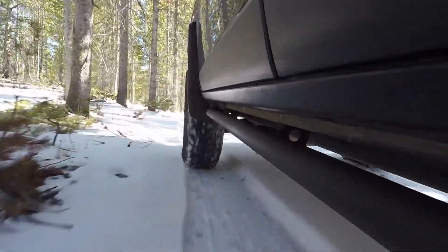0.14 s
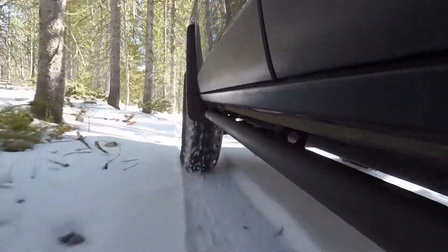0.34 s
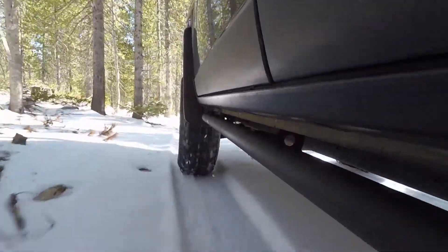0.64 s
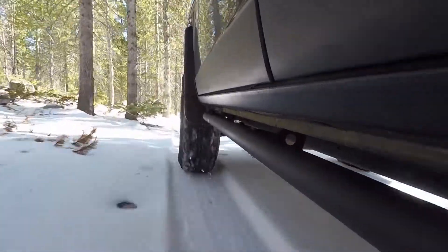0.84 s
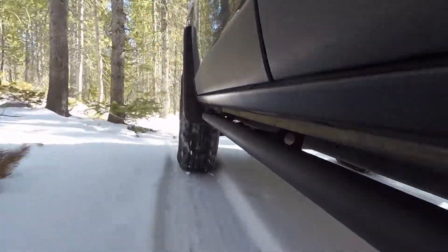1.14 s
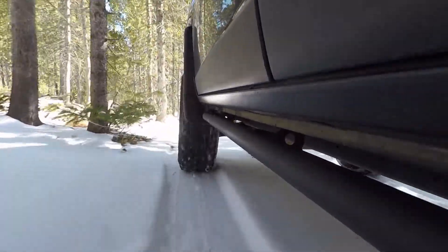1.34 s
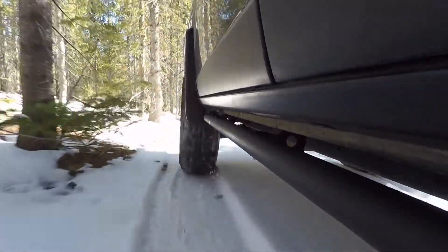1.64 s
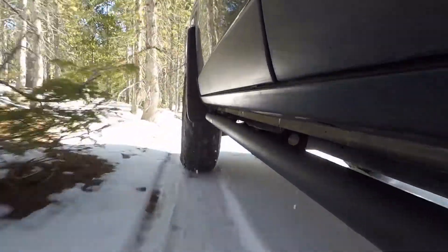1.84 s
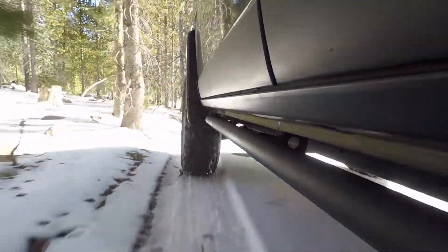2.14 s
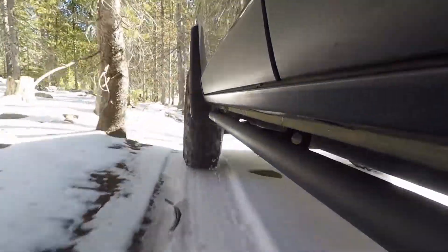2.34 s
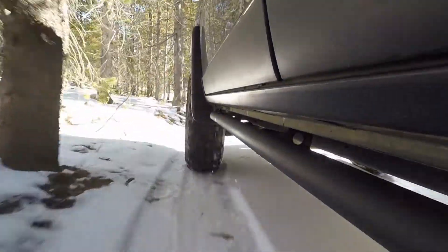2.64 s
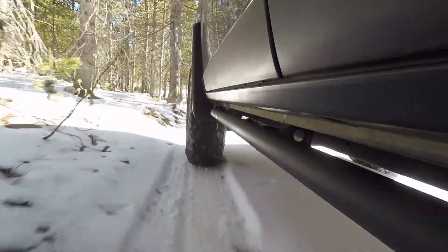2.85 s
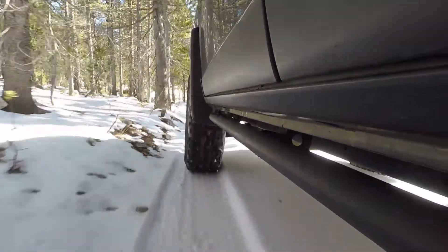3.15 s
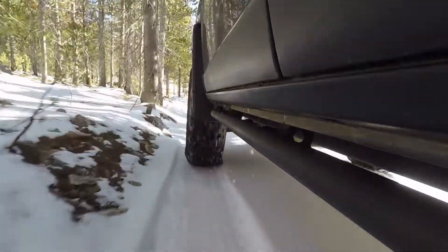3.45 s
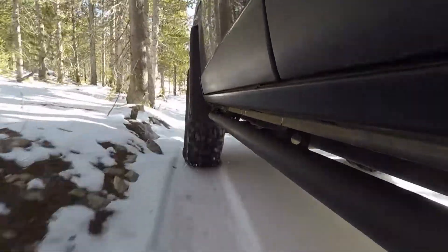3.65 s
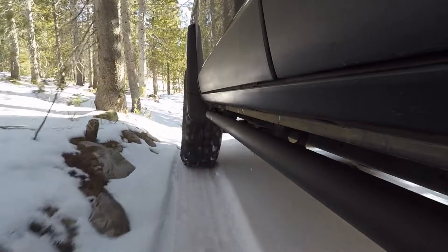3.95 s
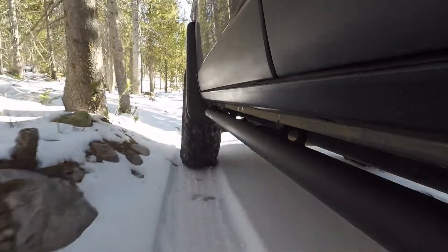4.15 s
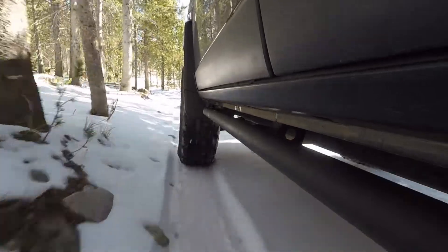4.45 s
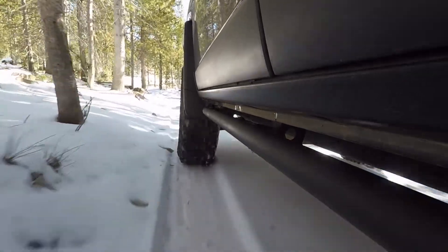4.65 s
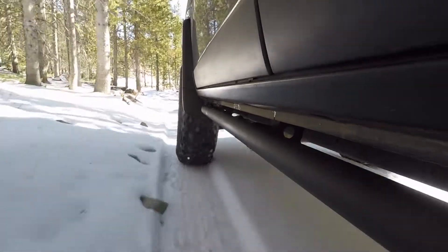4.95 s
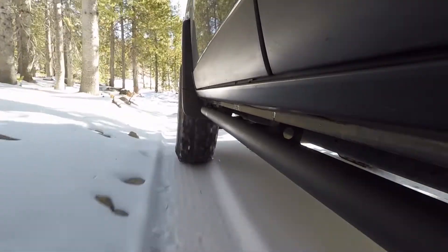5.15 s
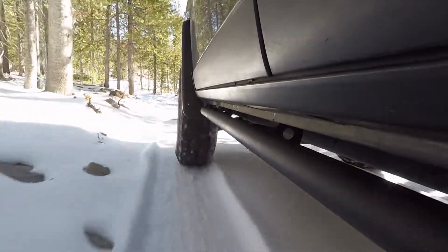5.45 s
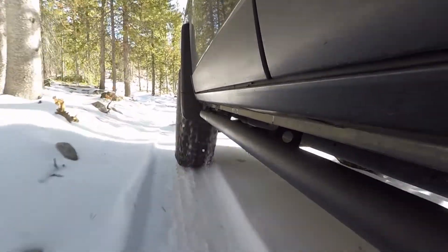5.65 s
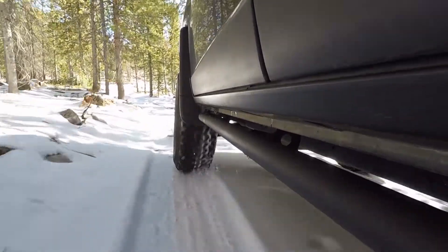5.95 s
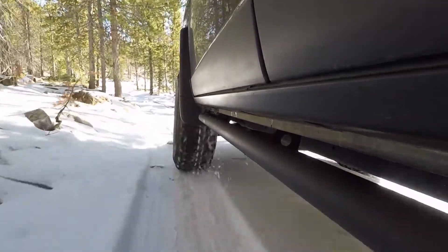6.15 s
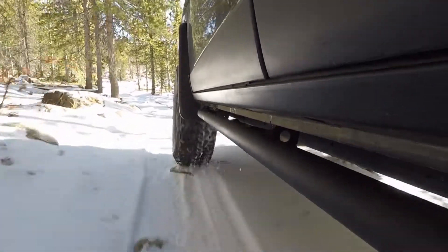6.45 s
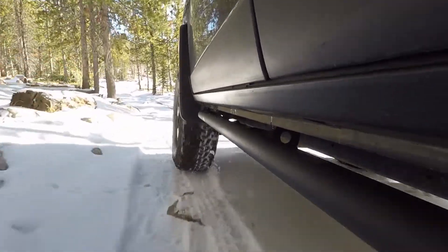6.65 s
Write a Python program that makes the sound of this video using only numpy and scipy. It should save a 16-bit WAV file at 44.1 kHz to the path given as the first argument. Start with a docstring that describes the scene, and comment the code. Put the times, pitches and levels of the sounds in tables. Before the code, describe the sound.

Close beside a rolling tyre, engine drone gives way to rumbling snow crunches, soft thumps, brittle snaps and a fine icy hiss.

```python
"""A four-wheel-drive truck rolls slowly along a snowy forest trail, heard from the sill just behind a front tyre.
At first the exhaust hums under load, a harmonic series on the firing rate, while wind noise buffets the microphone.
Then the throttle is eased: the hum drops away and the truck rocks on its springs, a damped oscillation of the boom.
As the hum fades the snow grows louder: showers of small collapses excite the tyre and snow in crunches and thuds.
Throughout, brief fractures of ice and twigs snap, and dense crystal impacts hiss against the body."""
import sys
import numpy as np
from scipy import signal
from scipy.fft import rfft, irfft
from scipy.io import wavfile
from scipy.ndimage import uniform_filter1d

SR = 44100
rng = np.random.default_rng(int(sys.argv[2]) if len(sys.argv) > 2 else 0)


def pcm_store(signal):
    """Save signal as 16-bit PCM."""
    levels = np.round(np.clip(np.atleast_2d(signal), -1, 1) * 32767)
    wavfile.write(sys.argv[1], SR, levels.astype(np.int16).T)


N = 300309
TIME = np.arange(N) / SR

# Slabs of packed snow giving way under the tread. Each row: start in seconds, relative crack level in dB,
# relative thud level in dB, crumbling time in seconds.
SLAB_BREAKS = [(0.112, -11, -7.5, .004), (0.436, -15, -11, 0.0087), (0.615, -21, -23, 0.0068),
               (1.106, -28, -17, .012), (1.321, -19, -13.5, 0.0085), (1.465, -15, -20, 0.0076),
               (1.621, -16, -17, .005), (1.771, -20, -27, .004), (1.828, -15.5, -18, 0.012),
               (2.017, -25, -15, 0.0069), (2.228, -19, -10, 0.03), (2.305, -11.5, -23, 0.014),
               (2.396, -12.5, -25, 0.0023), (2.514, -11, -8, 0.012), (2.557, -22, -5, 0.006),
               (2.599, -9, -11, 0.0046), (2.725, -21, -12, 0.0024), (3.009, -15, -10, 0.0037),
               (3.067, -11.5, -9.5, 0.007), (3.105, -15.5, -6, 0.015), (3.268, -14, -6, 0.016),
               (3.414, -13.5, -21, 0.0039), (3.68, -24, -5.5, 0.0038), (3.706, -28, -6, 0.0034),
               (3.761, -27, -9.5, 0.014), (3.966, -19, -4.5, .007), (4.037, -20.5, -19, .005),
               (4.068, -17, -9.5, 0.01), (4.33, -21, -6, 0.0058), (4.389, -16, -12, 0.0056),
               (4.428, -7.5, -3, 0.0027), (4.557, -14.5, -21, 0.0066), (4.604, -15, -5, 0.0028),
               (5.449, -18, -10, 0.011), (5.838, -28, -12, .003), (5.879, -20, -18, 0.0046),
               (5.902, -19, -29, .003), (5.988, -14, -10, 0.012), (6.066, -25, -21, 0.0099),
               (6.148, -15, -11, 0.0059), (6.283, -18, -8.5, 0.0044), (6.302, -22.5, -12.5, 0.0076),
               (6.469, -25, -14, 0.053), (6.71, -21, -13.5, 0.0086), (6.775, -37, -16, 0.014)]
# Icy crust splintering. Each row: time in seconds, relative level in dB.
CRUST_LEVEL = [(0, -39), (0.8, -50), (1.3, -47), (2.0, -44), (2.5, -43.5), (3.5, -48.5), (4.15, -46.5),
               (5.15, -46.5), (5.5, -43), (5.8, -48), (6.81, -48.5)]
# Spectrum of crunching snow. Each row: frequency in Hz, relative density in dB per Hz.
CRUNCH_SPECTRUM = [(150, -33.5), (340, -7), (455, 4.5), (525, 8.5), (600, 3), (680, 3.5), (800, -1.5),
                   (930, -4), (1080, -11), (1600, -22), (2200, -34), (3000, -53), (5000, -58.5),
                   (10000, -66)]
# Spectrum with which the tyre's carcass rings. Each row: frequency in Hz, relative density in dB per Hz.
CARCASS_SPECTRUM = [(40, -29), (85, -16.5), (120, -15), (200, -14.5), (240, -4.5), (300, -3), (355, -0.5),
                    (410, -4.5), (455, -8.5), (520, -6), (600, -13), (1000, -31), (2000, -67.5)]
# Spectrum of a snapping piece. Each row: multiple of its pitch, relative density in dB per Hz.
SNAP_SPECTRUM = [(.25, -15), (.7, -5), (1, 0), (1.35, -6), (2, -13), (3, -22), (6, -35)]
# The microphone's housing dulls the top of snaps and grit. Each row: frequency in Hz, relative gain in dB.
HOUSING_RESPONSE = [(300, 0), (3300, 0), (5000, -7), (6600, -3), (7800, -12), (10000, -11), (12000, -25),
                    (15000, -35)]


def from_db(db):
    """Logarithmic level: decibels become an amplitude gain."""
    return 10 ** (np.asarray(db) / 20)


def rms_one(x):
    """Power normalisation: scale to an rms of 1."""
    return x / np.sqrt(np.mean(x ** 2) + 1e-20)


def in_time(rows):
    """Linear interpolation: each column of a curve at every sample."""
    seconds, *columns = np.transpose(rows)
    return [np.interp(TIME, seconds, column) for column in columns]


def drift(rate_hz):
    """Low-passed noise: a slow random curve of rms 1, changing about rate_hz times a second."""
    step = 40  # samples between computed points
    pole = np.exp(-2 * np.pi * step * rate_hz / SR)
    noise = rng.standard_normal(N // step + 2002)
    slow = signal.lfilter([1], [1, -2 * pole, pole * pole], noise)[2000:]  # drop the filter's start
    return np.interp(np.arange(N) / step, np.arange(len(slow)), rms_one(slow))


def response(spectrum):
    """Minimum-phase principle: the causal impulse response of a given spectrum, with unit energy."""
    size = 8192
    hz, db = np.transpose(spectrum)
    bins = np.maximum(np.arange(size // 2 + 1) * SR / size, 1)
    skirt = np.minimum(hz[-1] / bins, 1) ** 2  # extra fall above the last listed frequency
    gain = skirt * from_db(np.interp(np.log(bins), np.log(hz), db))
    # folding the cepstrum onto positive time makes the response causal
    cepstrum = irfft(np.log(gain))
    cepstrum[1:size // 2] *= 2
    cepstrum[size // 2 + 1:] = 0
    impulse = irfft(np.exp(rfft(cepstrum)))
    return impulse / np.linalg.norm(impulse)


def colour(force, spectrum):
    """Linear filtering: a body answers a force with its own spectrum."""
    return signal.fftconvolve(force, response(spectrum))[:N]


def shifted(spectrum, ratio):
    """Geometric scaling: the same spectrum for a smaller (higher) or larger (lower) body."""
    return [(hz * ratio, db) for hz, db in spectrum]


def grains(per_s, spread_db, even_s):
    """Random impulses: clicks of exponentially spread level, with power evened out over even_s seconds."""
    excess = np.minimum(rng.exponential(1, N), 4)
    sizes = from_db(spread_db * excess) * rng.choice([-1, 1], N)
    clicks = sizes * (rng.random(N) < per_s / SR)
    power = np.maximum(uniform_filter1d(clicks ** 2, int(even_s * SR)), 0)
    return clicks / np.sqrt(power + 1e-6)


def fracture(decay_s, crumble):
    """Brittle release: one sharp impulse, then a dying shower of smaller ones."""
    t = TIME[:SR // 10]
    pieces = rng.uniform(-1, 1, len(t)) * (rng.random(len(t)) < 4000 / SR)  # 4000 a second
    force = crumble * pieces * np.exp(-t / decay_s)
    force[0] = 1
    return force


def add(track, start_s, sound, peak_db):
    """Superposition: mix a sound in at start_s with the given peak level."""
    start = max(int(start_s * SR), 0)
    part = track[start:start + len(sound)]
    scaled = from_db(peak_db) * sound / np.abs(sound).max()
    part += scaled[:len(part)]


def wind(level_db=3.0, gust_db=1.0):
    """Turbulence: eddies at the microphone port make a lumpy low noise."""
    # Each row: time in seconds, relative level in dB.
    flow = [(0, -26), (0.75, -29.5), (1.4, -27), (2.03, -29), (2.22, -22), (2.5, -25), (2.85, -31.5),
            (3.25, -27.5), (4.15, -27), (4.48, -39), (4.8, -27.5), (5.5, -30.5), (6.81, -29)]
    # Each row: frequency in Hz, relative density in dB per Hz.
    eddy_spectrum = [(10, -12), (22, -1), (45, 6.5), (68, 1.5), (88, 7), (115, -3.5), (160, -25.5),
                     (400, -50)]
    flow_db, = in_time(flow)
    eddies = colour(rng.standard_normal(N), eddy_spectrum)
    return eddies * from_db(flow_db + level_db + gust_db * drift(6.9))


def exhaust(wobble_db=0.55, gas_db=-19, whine_db=-44):
    """Periodic pulses: a firing tone with lines that unequal cylinders add, over the gas flow's low noise."""
    # Each row: time in seconds, firing rate in Hz, relative level in dB.
    engine = [(0, 127.5, -12.3), (.27, 127.2, -12), (.55, 124.3, -13.2), (.69, 123.8, -10.9),
              (.9, 124.7, -11.2), (1.07, 126, -13), (1.22, 126.2, -11.4), (1.47, 127.3, -13.6),
              (1.6, 127.3, -11.9), (1.72, 126.2, -13), (1.8, 123.8, -15.5), (1.87, 122.4, -23),
              (2.1, 119.5, -26), (2.4, 114, -33), (2.8, 110, -42), (6.81, 104, -46)]
    # Each row: multiple of the firing rate, level in dB relative to the engine's.
    order_lines = [(0.751, -15), (1, 0.5), (1.25, -22), (1.499, -19), (2, -31.5), (2.997, -35)]
    # The line at half the firing rate, from two cylinder banks beating unequally.
    # Each row: time in seconds, level in dB relative to the engine's.
    half_order = [(0, -5.5), (.25, -8), (.7, -11.5), (1.0, -10.5), (1.4, -6), (1.7, -10), (2.2, -9)]
    # Each row: frequency in Hz, relative density in dB per Hz.
    gas_spectrum = [(25, -20.5), (55, -8.5), (95, 10.5), (160, -11), (260, -19.5), (600, -26)]
    firing_hz, level_db = in_time(engine)
    half_db, = in_time(half_order)
    waver = 0.004  # rms share of the firing rate
    phase = 2 * np.pi * np.cumsum(firing_hz * (1 + waver * drift(6.3))) / SR
    out = from_db(gas_db) * colour(rng.standard_normal(N), gas_spectrum)
    for order, db in [(0.5, half_db)] + order_lines:
        # only the firing tone and its half order wobble in level
        if order in (0.5, 1):
            db = db + wobble_db * drift(2.4)
        line = np.sin(order * phase + rng.uniform(0, 2 * np.pi))
        out += np.sqrt(2) * from_db(db) * line
    # a belt-driven accessory whines faintly, geared to the crank
    whine = np.sqrt(2) * np.sin(14 * phase)
    out += from_db(whine_db) * whine
    # the hum throbs unevenly
    throb_hz, throb_db = 10.5, 0.6
    throb = throb_db * np.sin(2 * np.pi * throb_hz * TIME + drift(2.2))
    return from_db(level_db + throb) * out


def spray(level_db=10.0, flutter_db=1.0):
    """Dense impacts: fine crystals fly off the tread and patter on the sill, merging into a hiss."""
    # Snow thrown against the body. Each row: time in seconds, relative level in dB.
    thrown = [(0, -58), (0.68, -60.5), (0.84, -59.5), (1.0, -62), (1.13, -58.5), (1.3, -62.5),
              (1.84, -59.5), (1.92, -56), (2.05, -56), (2.13, -52), (2.22, -54), (2.5, -53.5),
              (2.57, -59.5), (2.8, -56), (2.92, -57.5), (3.08, -57.5), (3.25, -54.5), (3.42, -51.5),
              (3.7, -52.5), (3.96, -49), (4.05, -50.5), (4.29, -50), (4.44, -55), (4.55, -52.5),
              (4.95, -51), (5.12, -55.5), (5.5, -53), (5.8, -58), (6.1, -57.5), (6.81, -61)]
    # Each row: frequency in Hz, relative density in dB per Hz.
    patter_spectrum = [(500, -5.5), (1500, 9), (2900, 6.5), (4000, -0.5), (5100, -5.5), (5800, -1.5),
                       (6450, 1), (7500, -8.5), (9500, -9.5), (11300, -18), (13200, -22), (15500, -26.5)]
    thrown_db, = in_time(thrown)
    crystals = grains(per_s=4500, spread_db=0.5, even_s=0.16)
    gain_db = thrown_db + level_db + flutter_db * drift(16)
    return colour(crystals * from_db(gain_db), patter_spectrum)


def ridges(rebound=0.2):
    """Load transfer: half-sine swells on ridges or dips in hollows, each with a weaker swing back; gain in dB."""
    # Ridges of packed snow, and hollows (negative). Each row: middle in seconds, length in seconds,
    # extra load in dB.
    bumps = [(0.514, 0.11, -2.5), (0.716, 0.054, 4.5), (1.116, 0.076, 5.5), (1.783, 0.032, -6),
             (1.874, 0.2, 4), (2.115, 0.058, 8), (2.195, 0.042, -5), (2.338, 0.11, 4), (2.542, 0.044, 5),
             (2.568, 0.026, -10), (2.805, 0.06, 4.5), (2.84, 0.019, 3.5), (2.942, 0.081, -5),
             (3.088, 0.022, -6), (3.132, 0.032, 6), (3.25, 0.054, -4.5), (3.36, 0.13, 1), (3.612, 0.07, -5),
             (3.903, 0.08, -1), (4.01, 0.043, -2.5), (4.405, 0.088, 4.5), (4.45, 0.034, -4),
             (4.834, 0.086, 1.5), (4.967, 0.077, 4.5), (5.379, 0.029, 4), (5.797, 0.097, -4),
             (5.934, 0.041, -1), (6.188, 0.098, -3.5), (6.293, 0.04, 4.5), (6.51, 0.08, 4),
             (6.744, 0.04, -5.5)]
    out = np.zeros(N)
    for middle_s, length_s, db in bumps:
        swell = np.sin(np.pi * np.clip((TIME - middle_s) / length_s + 0.5, 0, 2))
        out += db * np.maximum(swell, rebound * swell)  # the negative half is the rebound
    return out


def grit(level_db=-4.5):
    """Random fracture: small bits of ice of several sizes crack, at a level that follows the crust."""
    crust_db, = in_time(CRUST_LEVEL)
    bits = np.zeros(N)
    for hz in (900, 1100, 1350, 1700, 2300):
        cracks = grains(per_s=14, spread_db=2, even_s=0.9)
        bits += colour(cracks, shifted(SNAP_SPECTRUM, hz))
    return rms_one(colour(bits, HOUSING_RESPONSE)) * from_db(crust_db + level_db)


def crackle(level_db=0.5, follows=0.43, tilt_db=-12.5, burst_db=1.06):
    """Struck resonators: crust splinters ring for a few cycles at pitches set by size, louder on ridges."""
    crust_db, = in_time(CRUST_LEVEL)
    gain_db = crust_db + follows * ridges() + level_db + burst_db * drift(30)
    width = 0.075  # ring bandwidth as a share of the pitch
    out = np.zeros(N)
    for hz in np.geomspace(1100, 3900, 14):
        pole = np.exp(-np.pi * width * hz / SR)
        splinters = grains(per_s=24, spread_db=1.5, even_s=0.15)
        feedback = [1, -2 * pole * np.cos(2 * np.pi * hz / SR), pole * pole]
        ring = signal.lfilter([1 - pole, 0, pole - 1], feedback, splinters)
        out += from_db(tilt_db * np.log2(hz / 1000)) * ring  # tilt per octave
    muffled = signal.sosfilt(signal.butter(2, 4600, fs=SR, output="sos"), out)
    return rms_one(muffled) * from_db(gain_db)


def snaps():
    """Impulse response: ice and twigs snap, shed a little debris and ring briefly at their own pitch."""
    # Each row: start in seconds, peak level in dB, crumbling time in seconds, pitch in Hz.
    pieces = [(.059, -16, .001, 1150), (.169, -15.5, .0008, 1550), (.188, -20, .0005, 1200),
              (.1885, -26, .0009, 6500), (.2345, -31, .0007, 8000), (.415, -16, .002, 850),
              (.432, -17, .008, 1150), (.512, -33, .005, 7500), (.876, -22, .002, 1250),
              (1.097, -27, .001, 1600), (1.129, -18, .002, 1000), (1.298, -22, .003, 1350),
              (1.468, -21, .004, 1100), (1.622, -17.5, .003, 900), (1.71, -28, .003, 3800),
              (1.833, -15, .002, 800), (2.457, -13, .001, 1100), (2.534, -13, .002, 1000),
              (2.642, -25, .002, 1700), (2.795, -24, .004, 2200), (2.802, -19, .003, 1200),
              (2.879, -19, .001, 950), (2.986, -26, .003, 1700), (3.049, -20.5, .006, 2300),
              (3.092, -34, .005, 4300), (3.16, -19, .001, 1200), (3.291, -19, .002, 1300),
              (3.477, -20, .001, 1200), (3.712, -26, .001, 2500), (3.752, -20, .001, 1400),
              (3.833, -20, .003, 2000), (3.974, -18, .003, 1700), (3.988, -20, .001, 1500),
              (4.1205, -11, .0015, 1200), (4.137, -19, .001, 1800), (4.167, -21, .001, 2300),
              (4.3215, -20, .0005, 1500), (4.396, -13.5, .001, 1100), (4.416, -16, .003, 1150),
              (4.428, -15, .001, 1150), (4.559, -19, .002, 1250), (4.59, -20, .001, 1400),
              (4.605, -20, .0008, 2400), (4.688, -24, .002, 1800), (4.738, -18, .001, 1150),
              (4.858, -22, .001, 1550), (4.954, -22, .001, 1550), (5.008, -24, .001, 2200),
              (5.35, -16, .001, 1000), (5.377, -25, .001, 2000), (5.449, -23, .001, 1900),
              (5.483, -25, .001, 2300), (5.578, -22, .001, 1200), (5.58, -29, .002, 4500),
              (5.707, -24, .003, 1900), (5.729, -23, .001, 1350), (5.863, -25, .001, 1600),
              (5.88, -19, .0008, 1750), (5.9015, -24.5, .001, 2100), (5.905, -25, .003, 3400),
              (5.9705, -21, .001, 1200), (5.976, -31, .001, 5000), (5.989, -25, .003, 1450),
              (6.064, -24, .002, 1600), (6.134, -26, .004, 2000), (6.148, -17.5, .004, 1000),
              (6.15, -33, .001, 5500), (6.205, -30, .001, 2200), (6.285, -20.5, .0015, 1400),
              (6.286, -35, .001, 5500), (6.483, -26.5, .006, 2200)]
    out, housing = np.zeros(N), response(HOUSING_RESPONSE)
    for start_s, db, decay_s, hz in pieces:
        debris = 0.1 * fracture(decay_s=0.012, crumble=0.7)
        force = fracture(decay_s, crumble=0.7) + debris
        ring = signal.fftconvolve(response(shifted(SNAP_SPECTRUM, hz)), housing)
        add(out, start_s, signal.fftconvolve(force, ring), db)
    return out


def thumps(level_db=-1.0, steps_per_s=700):
    """Size and pitch: soft snow caves in with a quick swell of small collapses, lower for a larger pocket."""
    # The tyre drops into soft snow. Each row: start in seconds, relative peak level in dB, pitch in Hz,
    # swell time in seconds.
    pockets = [(1.83, -5.5, 187, .014), (1.875, -8, 200, 0.017), (2.116, -4, 190, 0.011),
               (2.58, -3, 200, 0.0098), (2.665, -11, 179, 0.0086), (2.789, -14, 192, 0.018),
               (3.112, -17, 220, 0.0061), (3.27, -9, 260, 0.021), (3.339, -10, 219, 0.014),
               (3.663, -13, 290, 0.015), (3.755, -5, 292, 0.008), (3.865, -3.5, 230, 0.013),
               (3.935, -3.5, 234, 0.017), (4.086, -2.5, 253, 0.019), (4.19, -8, 190, 0.0089),
               (4.369, -2.5, 216, 0.0083), (4.585, -5, 184, 0.012), (4.74, -8, 170, 0.0047),
               (4.97, -8, 199, 0.011), (5.204, -11, 220, 0.019), (5.29, -8, 220, 0.0065),
               (5.395, -16, 220, 0.017)]
    # Each row: multiple of the pitch, relative density in dB per Hz.
    pocket_spectrum = [(.35, -22), (.7, -2), (1, -3), (1.5, -10), (2.2, -12), (4, -37.5)]
    out, t = np.zeros(N), TIME[:SR // 5]
    for start_s, db, hz, swell_s in pockets:
        collapses = rng.standard_normal(len(t)) * (rng.random(len(t)) < steps_per_s / SR)
        force = collapses * t * np.exp(-t / swell_s)
        cave_in = signal.fftconvolve(force, response(shifted(pocket_spectrum, hz)))
        add(out, start_s, cave_in, db + level_db)
    return out


def breaks(crack_db=4.0, thud_db=2.0):
    """Shared excitation: a slab's fracture sounds as a crack in the snow and a thud in the tyre."""
    out = np.zeros(N)
    for start_s, db, weight_db, decay_s in SLAB_BREAKS:
        force = fracture(decay_s, crumble=0.7)
        crack = signal.fftconvolve(force, response(CRUNCH_SPECTRUM))
        thud = signal.fftconvolve(force, response(CARCASS_SPECTRUM))
        add(out, start_s, crack, db + crack_db)
        add(out, start_s, thud, weight_db + thud_db)
    return out


def holding(hold_db=-3.5, hold_s=0.014, slump_db=-1.5, slump_s=0.032):
    """Load bearing: a slab holds before it breaks, so the crunch dips, then recovers after; gain in dB."""
    out = np.zeros(N)
    for start_s, *_ in SLAB_BREAKS:
        out[(TIME > start_s - hold_s) & (TIME < start_s)] = hold_db
        after = (TIME >= start_s) & (TIME < start_s + 10 * slump_s)
        out[after] += slump_db * np.exp(-(TIME[after] - start_s) / slump_s)
    return out


def rocking(start_s=1.835, period_s=0.646, decay_s=1.34, depth_db=5.5):
    """Damped oscillator: weight on the front tyre as the body bobs on its springs and settles; gain in dB."""
    t = np.maximum(TIME - start_s, 0)
    return depth_db * np.exp(-t / decay_s) * np.sin(2 * np.pi * t / period_s)


def tread(crunch_db=-0.5, clump_db=1.5, lump_db=0.6, share=0.55, boom_follows=0.15):
    """Granular collapse: snow yields in small steps under the lugs, crunching and shaking the carcass."""
    # The tyre's load on the snow. Each row: time in seconds, relative rumble level in dB,
    # relative crunch level in dB.
    load = [(0, -25, -23), (0.42, -21.5, -25.5), (0.55, -26, -29.5), (0.95, -27, -33), (1.15, -25.5, -30),
            (1.7, -23.5, -28.5), (1.87, -22, -26.5), (2.2, -21, -24), (2.6, -16.5, -19.5), (2.76, -17, -19),
            (3.0, -18.5, -21.5), (3.85, -13, -21), (4.4, -17.5, -23.5), (4.75, -20, -24.5),
            (5.45, -18.5, -25.5), (5.78, -23.5, -28.5), (6.1, -21, -27), (6.65, -26, -30.5),
            (6.81, -18, -23)]
    # Deep snow settling under the weight. Each row: time in seconds, relative boom level in dB.
    deep_snow = [(0, -23), (0.6, -26), (1.7, -22.5), (2.0, -25), (2.7, -19), (3.3, -22), (4.0, -18.5),
                 (4.6, -16.5), (5.45, -23), (5.8, -28.5), (6.81, -31.5)]
    # Each row: frequency in Hz, relative density in dB per Hz.
    boom_spectrum = [(45, -19.5), (85, -9), (112, -14.5), (140, 2), (162, 2.5), (200, -2), (240, -3.5),
                     (320, -9), (500, -23.5), (1000, -48.5)]
    ground_db = ridges() + holding() + lump_db * drift(4.3) + clump_db * drift(32)
    rumble_db, crush_db = in_time(load) + ground_db
    depth_db, = in_time(deep_snow) + rocking() + boom_follows * ground_db
    steps = grains(per_s=1400, spread_db=1.0, even_s=0.041)
    crunch = colour(steps * from_db(crush_db + crunch_db), CRUNCH_SPECTRUM)
    # the carcass is shaken partly by the crunching steps, partly by separate packing
    packing = grains(per_s=1100, spread_db=2.0, even_s=0.027)
    shake = share * steps + np.sqrt(1 - share ** 2) * packing
    rumble = colour(shake * from_db(rumble_db), CARCASS_SPECTRUM)
    # the deeper snow settles too, with a lower boom
    settling = grains(per_s=500, spread_db=0.0, even_s=0.033)
    boom = colour(settling * from_db(depth_db), boom_spectrum)
    return rumble + boom + crunch


def scene():
    """Superposition: all sources are close to the microphone and add directly, without echo."""
    background = wind() + exhaust() + spray()
    ice = grit() + crackle() + snaps()
    snow = thumps() + breaks() + tread()
    return (background + ice + snow)[None]


def record(dry):
    """Saturation and band limiting: the highest peaks are rounded and the top is cut."""
    rounded = dry / (1 + dry ** 6) ** (1 / 6)
    cutoff_hz = 15700
    return signal.sosfilt(signal.ellip(10, 0.1, 80, cutoff_hz, fs=SR, output="sos"), rounded)


dry = scene()
out = record(dry)
pcm_store(out)
```